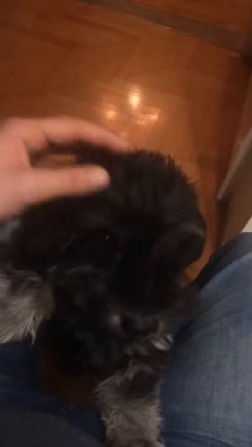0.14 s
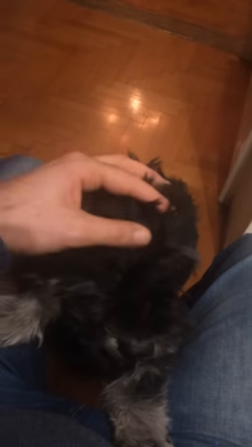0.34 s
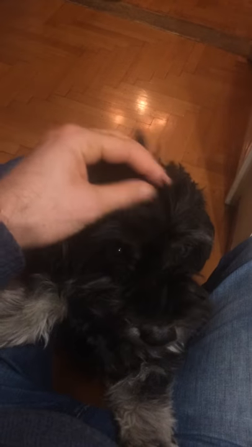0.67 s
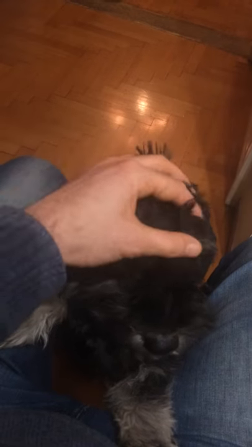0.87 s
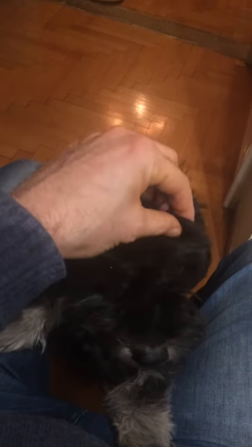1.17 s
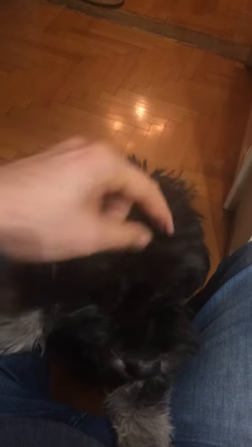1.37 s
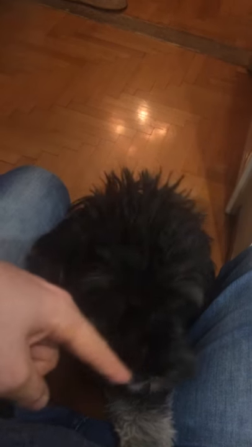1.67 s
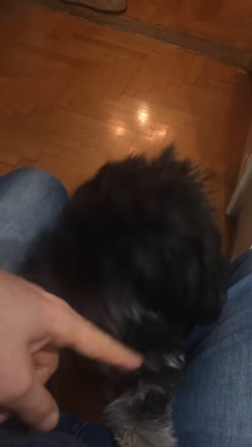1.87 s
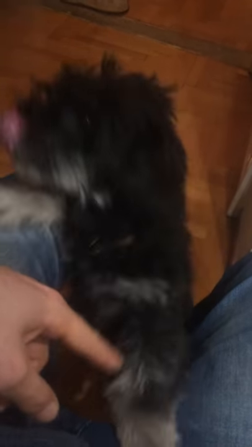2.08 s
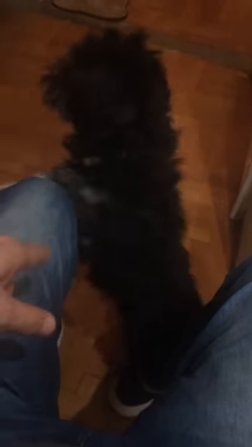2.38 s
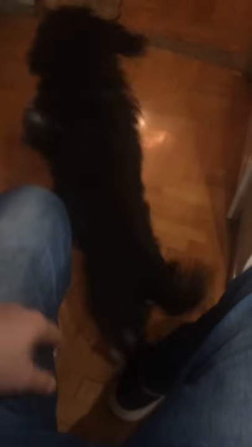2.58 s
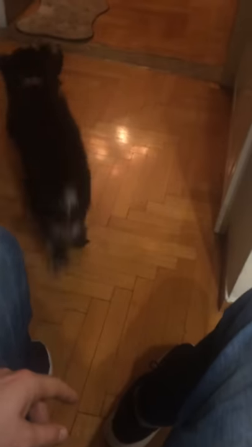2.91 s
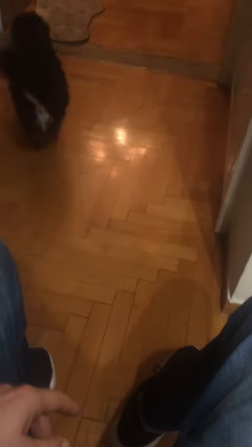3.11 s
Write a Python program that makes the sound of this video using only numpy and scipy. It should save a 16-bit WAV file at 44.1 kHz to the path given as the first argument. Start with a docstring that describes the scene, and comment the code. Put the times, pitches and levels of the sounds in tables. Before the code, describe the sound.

Dog claws click and paws thump softly on hard wood, with crockery knocking in the background

```python
"""Small dog on parquet, knocks across the room

A quiet flat with hard floors, heard by a small microphone without deep bass, over steady room tone.
Across the room, crockery and furniture knock: grainy cracks and ringing modes, blurred by noise echoes.
Close by, a small dog drops down: its fur rustles on cloth as treble hiss, its paws set the boards
booming, and its claws tick on the parquet as short bright noise with a ring.
"""
import sys
import numpy as np
from scipy import signal
from scipy.fft import rfft, irfft
from scipy.io import wavfile

SR = 44100
rng = np.random.default_rng(int(sys.argv[2]) if len(sys.argv) > 2 else 0)


def dump(signal):
    """Clip the signal to [-1, 1] and save it as 16-bit WAV at the path in sys.argv[1]."""
    limited = np.clip(np.atleast_2d(signal).T, -1, 1)
    pcm = np.round(limited * 32767).astype(np.int16)
    wavfile.write(sys.argv[1], SR, pcm)


N = 143325


def amp(db):
    """Turn decibels into an amplitude factor."""
    return 10 ** (np.asarray(db) / 20)


def unit_energy(x):
    """Scale to energy 1."""
    return x / np.sqrt(np.sum(x ** 2) + 1e-20)


def at_hz(points, hz):
    """Read a (Hz, value) curve at hz, in straight lines over log frequency."""
    curve = np.array(points)
    return np.interp(np.log(hz), np.log(curve[:, 0]), curve[:, 1])


def band(x, low_hz, high_hz):
    """Keep the sound between two frequencies."""
    return signal.sosfilt(signal.butter(2, [low_hz, high_hz], "band", fs=SR, output="sos"), x)


def ring(hz, t60, size):
    """A struck mode: a sine of starting height 1 that falls 60 dB in t60 seconds."""
    t = np.arange(size) / SR
    return np.sin(2 * np.pi * hz * t) * amp(-60 * t / t60)


def add(out, start_s, x):
    """Mix x into out from start_s seconds."""
    i = int(start_s * SR)
    out[i:i + len(x)] += x[:len(out) - i]


# Tone of the quiet flat. Each row: frequency in Hz, relative level in dB per Hz.
AIR_SPECTRUM = [(15, -61), (25, -33), (53, -1.5), (127, -7), (145, -2), (185, -3), (301, -10.5), (344, -14),
                (405, -9), (754, -19), (1190, -18.5), (1790, -20.5), (11600, -47), (14800, -89),
                (16000, -63)]
AIR_DB = -45.5  # overall level before the microphone


def air():
    """Steady room tone: noise shaped by a fixed spectrum."""
    hz = np.arange(N // 2 + 1) * SR / N + 1  # the 1 keeps the logarithm finite
    spectrum = rfft(rng.standard_normal(N)) * amp(at_hz(AIR_SPECTRUM, hz))
    return amp(AIR_DB) * np.sqrt(N) * unit_energy(irfft(spectrum, N))


# Decay of the hard-floored room, before stretching. Each row: frequency in Hz, 60 dB decay time in seconds.
ROOM_DECAY = [(100, 0.34), (500, 0.4), (2000, 0.35), (5000, 0.34), (12000, 0.19)]
EARLY_S = 0.013  # time constant of the extra strength of the early echoes


def echo(hz, contact_s, early_db, stretch, rise_s):
    """A contact heard through the room around hz: noise that rises, holds and dies, strongest early on."""
    t = np.arange(SR // 2) / SR
    early_fall_db = early_db * (np.exp(-t / EARLY_S) - 1)
    room_fall_db = 60 * np.maximum(t - contact_s, 0) / (stretch * at_hz(ROOM_DECAY, hz))
    envelope = (1 - np.exp(-t / rise_s)) * amp(early_fall_db - room_fall_db)
    return envelope * rng.standard_normal(len(t))


# Edges in Hz of the bands that colour a crack, from low to high.
BAND_EDGES_HZ = [70, 120, 200, 400, 700, 1100, 1700, 2600, 3800, 6000, 9500, 13500]
LEAD_S = 0.004  # first arrival before the listed start
CRACK_DB, RATTLE_DB = -6.5, 2.5  # crack trim; graininess
MODE_SPREAD_DB = 1.48  # how unevenly a knock finds the modes


def crack(shape, band_db):
    """The grainy noise of a contact: random steps in level on the echo, coloured band by band."""
    click = signal.unit_impulse(SR // 4)
    grains = np.minimum(rng.exponential(1, SR // 50 + 1), 4)
    rattle = amp(RATTLE_DB * (grains.repeat(25)[:SR // 2] - 1))  # each grain lasts 25 samples
    total = 0
    for level_db, low_hz, high_hz in zip(band_db, BAND_EDGES_HZ, BAND_EDGES_HZ[1:]):
        body = unit_energy(band(band(click, low_hz, high_hz), low_hz, high_hz))
        blurred = rattle * echo(np.sqrt(low_hz * high_hz), *shape)
        total = total + amp(level_db + CRACK_DB) * signal.fftconvolve(blurred, body)
    return total


def struck_mode(hz, level_db, t60, shape, strike_db):
    """One mode of the thing struck, driven by a direct strike and by the echoes of the contact."""
    gain = amp(level_db + MODE_SPREAD_DB * rng.standard_normal())
    push = echo(hz, *shape)
    push[int(LEAD_S * SR)] += amp(strike_db)
    return gain * signal.fftconvolve(push, unit_energy(ring(hz, t60, SR // 4)))


# Pitches that a hollow knock has of its own. Each row: relative level in dB, 60 dB decay time in seconds.
OWN_RINGS = [(-24, 0.065), (-27.5, 0.064), (-36.5, 0.036)]


def knocks(rows, modes, strike_db):
    """Each knock is a crack plus the modes of the thing struck, all blurred by the room."""
    out = np.zeros(N)
    for start_s, ring_db, *rest in rows:
        shape, band_db, own_hz = rest[:4], rest[4:15], rest[15:]
        add(out, start_s - LEAD_S, crack(shape, band_db))
        own_modes = [(hz, *own) for hz, own in zip(own_hz, OWN_RINGS)]
        for hz, mode_db, t60 in modes + own_modes:
            add(out, start_s - LEAD_S, struck_mode(hz, ring_db + mode_db, t60, shape, strike_db))
    return out


STRIKE_DB, SOFT_STRIKE_DB = 20.5, 7.5  # direct strike before the echoes: crockery, duller things

# Dull knocks across the room. Each row: start in seconds, ring level in dB, contact length in seconds,
# extra dB of the early echoes, decay stretch, rise in seconds, then relative crack level in dB per band.
DULL_KNOCKS = [(0.046, -19, 0.0062, 5.7, 1.07, 0.0024, -53, -29.5, -30, -23, -29, -28.5, -29.5, -46, -46.5, -54, -58),
               (1.478, -11, 0.017, 4.54, 1.1, 0.0039, -31, -29, -22.5, -16, -16.5, -18.5, -17, -21.5, -29, -32.5, -40.5)]
# Modes of the dull things. Each row: frequency in Hz, relative level in dB, 60 dB decay time in seconds.
DULL_MODES = [(154.6, -14, 0.14), (510, -32, 0.041), (818, -18, 0.033), (1950, -27, .04), (3700, -32, .05),
              (6340, -35, 0.02), (8100, -46, .05)]


def dull_knocks():
    """Dull things knocked with a soft direct strike, so the echoes do more of the driving."""
    return knocks(DULL_KNOCKS, DULL_MODES, SOFT_STRIKE_DB)


# Bright knocks across the room. Each row: columns as for the dull knocks.
BRIGHT_KNOCKS = [(0.215, 1, 0.011, 6.45, 0.84, 0.0037, -33, -27.5, -28, -13.5, -14, -13, -20, -20.5, -29, -26.5, -33.5),
                 (0.823, -31, 0.0033, 5.3, 1, 0.0015, -55, -33.5, -45, -40.5, -39.5, -36, -41, -42.5, -57, -75, -75),
                 (0.884, -23.5, 0.0081, 5.8, 0.84, 0.0043, -59, -58, -44, -39, -30, -24.5, -27.5, -34.5, -71, -57, -70)]
# Modes of the bright things. Each row: frequency in Hz, relative level in dB, 60 dB decay time in seconds.
BRIGHT_MODES = [(170, -20, 0.11), (676, -21, 0.043), (730, -22.5, 0.032), (1335, -26, 0.15),
                (2026, -15, 0.034), (2352, -21.5, 0.081), (3270, -28, 0.091), (4800, -30, 0.021),
                (6627, -35, 0.031), (6880, -43, 0.091), (8059, -46, 0.05), (8200, -53, .06),
                (9200, -33.5, 0.061), (10400, -46, 0.057)]


def bright_knocks():
    """Crockery knocked with a hard direct strike that rings its many treble modes."""
    return knocks(BRIGHT_KNOCKS, BRIGHT_MODES, STRIKE_DB)


# Clinks across the room. Each row: columns as for the dull knocks.
CLINK_ROWS = [(0.407, -9, 0.0051, 6.2, 1.34, 0.0033, -53, -43, -31.5, -25, -23, -18.5, -23.5, -33.5, -33, -39, -44),
              (0.444, -22.5, 0.0055, 8.4, 2.33, 0.0026, -36, -48, -37.5, -39, -28, -27.5, -28.5, -34, -44, -47, -54)]
# Modes of the clinking things. Each row: frequency in Hz, relative level in dB, 60 dB decay time in seconds.
CLINK_MODES = [(139, -24.5, 0.082), (858, -25, 0.11), (1126, -16.5, .06), (1217, -22.5, 0.059),
               (1753, -26.5, 0.077), (1990, -12, 0.073), (2560, -21.5, 0.12), (2890, -22.5, 0.07),
               (3241, -23, 0.11), (4430, -29.5, 0.04), (4990, -27, 0.064), (6600, -38, 0.067),
               (9400, -42, .05)]


def clinks():
    """Crockery clinks: hard direct strikes on a set of modes of their own."""
    return knocks(CLINK_ROWS, CLINK_MODES, STRIKE_DB)


# Hollow knocks across the room. Each row: columns as for the dull knocks, then three own pitches in Hz.
HOLLOW_KNOCKS = [(1.163, -8, 0.038, 3.3, 0.87, 0.0037, -35, -39, -31, -38, -29.5, -27, -32, -41, -47, -49, -49, 1400, 2824, 5020),
                 (2.135, -5, 0.043, 4.2, 0.92, 0.0043, -40, -33, -39, -28, -28.5, -20.5, -23, -26.5, -37.5, -44, -45.5, 1637, 2815, 4990),
                 (2.405, -9.5, 0.028, 1.5, 1, 0.0053, -48, -53, -33.5, -35, -34, -34.5, -26, -31.5, -34, -44.5, -46, 1970, 3150, 4800),
                 (2.58, -12, 0.03, 0.83, 1, 0.0021, -41.5, -61, -35.5, -36.5, -31.5, -23, -22.5, -32, -39, -48, -49, 1430, 2875, 4790),
                 (2.752, -5, 0.018, 4.3, 0.89, 0.004, -48, -42, -27, -31.5, -31, -18, -21.5, -25.5, -27, -36, -42.5, 1318, 3350, 5500)]
# Modes of the hollow things. Each row: frequency in Hz, relative level in dB, 60 dB decay time in seconds.
HOLLOW_MODES = [(296, -26.5, 0.18), (670, -33, 0.15), (1059, -25.5, 0.028), (1351, -26.5, 0.025),
                (1651, -26.5, 0.065), (2026, -29.5, 0.11), (2339, -35, 0.15), (2827, -38.5, 0.027),
                (3115, -33, 0.14), (4700, -61, 0.15), (5001, -58.5, 0.15), (5526, -63.5, 0.15),
                (6530, -46.5, 0.15), (8030, -53, 0.15)]
HOLLOW_GAP_HZ, HOLLOW_GAP_WIDTH_HZ = 4120, 500  # a dark slot in the treble


def hollow_knocks():
    """Softly struck hollow things, each knock with three pitches of its own and a notch in the treble."""
    struck = knocks(HOLLOW_KNOCKS, HOLLOW_MODES, SOFT_STRIKE_DB)
    sharpness = HOLLOW_GAP_HZ / HOLLOW_GAP_WIDTH_HZ
    return signal.lfilter(*signal.iirnotch(HOLLOW_GAP_HZ, sharpness, fs=SR), struck)


# Fur on cloth, close by. Each row: time in seconds, level in dB before the microphone.
RUSTLE_LEVEL = [(0, -73), (.4, -73), (.5, -56.5), (.64, -59.5), (.72, -68.5), (1.58, -68), (1.605, -49),
                (1.66, -60), (1.72, -72), (2.402, -62), (2.85, -61.5), (2.89, -40.5), (2.99, -56),
                (3.04, -66), (3.17, -59), (3.25, -68)]
RUSTLE_LOW_HZ, RUSTLE_HIGH_HZ = 3240, 12400


def rustle():
    """Fur brushing on cloth: smooth treble hiss that swells and fades."""
    time_s, level_db = np.transpose(RUSTLE_LEVEL)
    noise = band(rng.standard_normal(N), RUSTLE_LOW_HZ, RUSTLE_HIGH_HZ)
    hiss = unit_energy(noise) * np.sqrt(N)
    return hiss * amp(np.interp(np.arange(N) / SR, time_s, level_db))


# Paws landing close by. Each row: start in seconds, relative level in dB.
PAW_THUMPS = [(2.883, -29), (2.904, -30), (2.934, -26.5), (2.964, -39), (3.015, -36)]
# Modes of the floor boards. Each row: frequency in Hz, relative level in dB, 60 dB decay time in seconds.
BOARD_MODES = [(133, 1, 0.28), (156.7, 3, 0.5), (190, -4, 0.13), (274, -2, 0.073)]
PAW_SOFT_HZ = 392  # lowpass cutoff


def paws():
    """A soft push sets the floor boards booming: decaying low modes with the treble cut."""
    out = np.zeros(N)
    for start_s, level_db in PAW_THUMPS:
        boom = sum(amp(mode_db) * ring(hz, t60, SR // 2) for hz, mode_db, t60 in BOARD_MODES)
        add(out, start_s, amp(level_db) * boom)
    return signal.sosfilt(signal.butter(2, PAW_SOFT_HZ, fs=SR, output="sos"), out)


CLAW_ECHO_STRETCH, ECHO_RISE_S = 0.63, 0.00084  # decay factor and build-up of a claw's echo


def claw_room():
    """Echo of a claw's click: noise dying octave by octave."""
    edges = np.geomspace(300, 19000, 7)
    total = 0
    for low_hz, high_hz in zip(edges, edges[1:]):
        noise = echo(np.sqrt(low_hz * high_hz), 0, 0, CLAW_ECHO_STRETCH, ECHO_RISE_S)
        total = total + band(noise, low_hz, high_hz)
    return total


# Claws on the parquet, close by. Each row: start in seconds, relative level in dB, ring pitch in Hz.
CLAW_TICKS = [(2.2604, -35.5, 3140), (2.5129, -27.5, 4440), (2.7074, -36.5, 3230), (2.8612, -25, 4270),
              (2.8832, -18.5, 3600), (2.9594, -29, 12500), (2.9637, -21.5, 9800), (3.0689, -22.5, 7800),
              (3.1428, -44, 6310), (3.1648, -35.5, 6640), (3.1945, -37, 6500)]
# Lower edge of each tick's noise in Hz, one for each claw row.
CLAW_LOW_HZ = [3000, 4000, 5000, 3500, 2200, 6550, 4430, 2130, 5950, 5430, 3500]
CLAW_T60_S, CLAW_RING_CYCLES = 0.015, 41  # 60 dB decay of the noise; of the ring, in cycles
CLAW_RING_DB, CLAW_ROOM_DB = -2.5, -17.5  # ring against the noise peak; echo trim


def claws():
    """A burst of bright noise a few milliseconds long, a short ring at the claw's pitch, and its echo."""
    out = np.zeros(N)
    t = np.arange(SR // 20) / SR
    for (start_s, level_db, hz), low_hz in zip(CLAW_TICKS, CLAW_LOW_HZ):
        burst = rng.standard_normal(len(t)) * amp(-60 * t / CLAW_T60_S)
        snap = band(burst, low_hz, 16000)
        claw_ring = amp(CLAW_RING_DB) * ring(hz, CLAW_RING_CYCLES / hz, len(t))
        tick = snap / np.abs(snap).max() + claw_ring
        reflected = signal.fftconvolve(unit_energy(tick), claw_room())
        add(out, start_s, amp(level_db) * tick)
        add(out, start_s, amp(level_db + CLAW_ROOM_DB) * reflected)
    return out


def scene():
    """Room tone, the knocks across the room, and the dog close by, in one channel."""
    far = dull_knocks() + bright_knocks() + clinks() + hollow_knocks()
    near = rustle() + paws() + claws()
    return (air() + far + near)[None]


MIC_LOW_HZ, CUTOFF_HZ = 77.4, 15650


def record(dry):
    """A small microphone without deep bass; the top is cut steeply."""
    thin = signal.sosfilt(signal.butter(2, MIC_LOW_HZ, "high", fs=SR, output="sos"), dry)
    return signal.sosfilt(signal.cheby2(16, 50, CUTOFF_HZ, fs=SR, output="sos"), thin)


dry = scene()
out = record(dry)
dump(out)
```